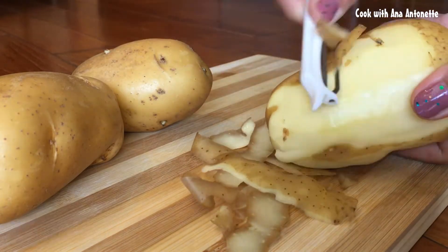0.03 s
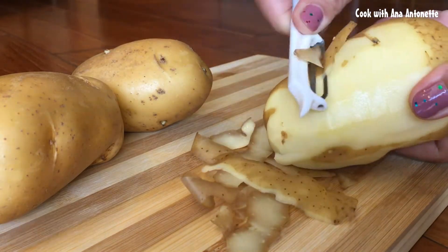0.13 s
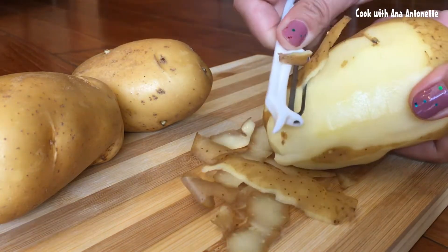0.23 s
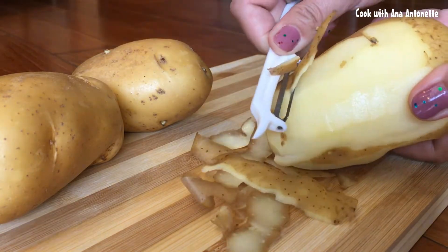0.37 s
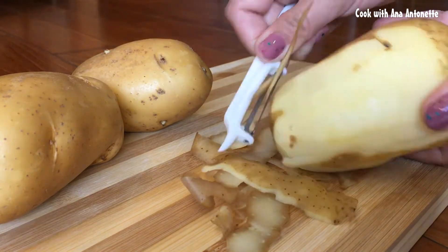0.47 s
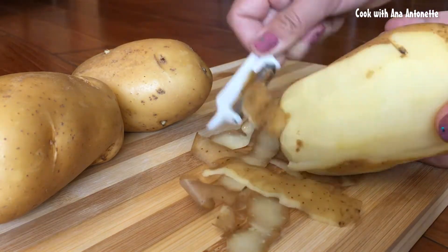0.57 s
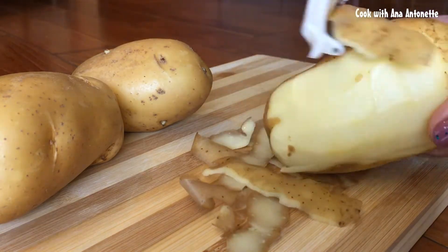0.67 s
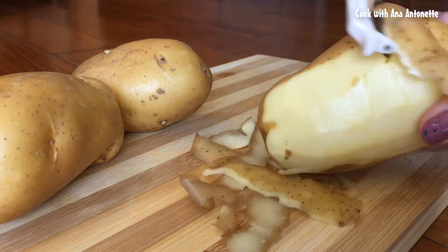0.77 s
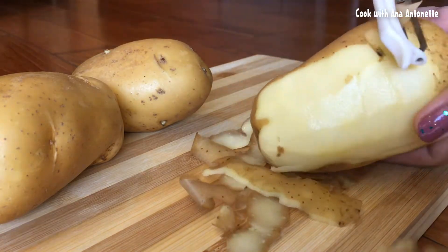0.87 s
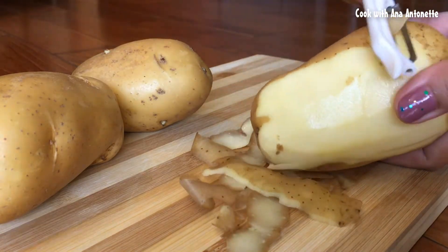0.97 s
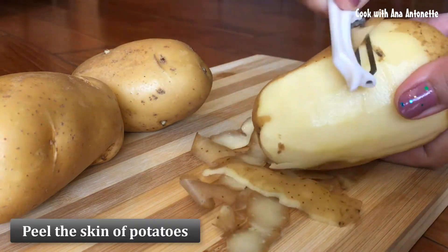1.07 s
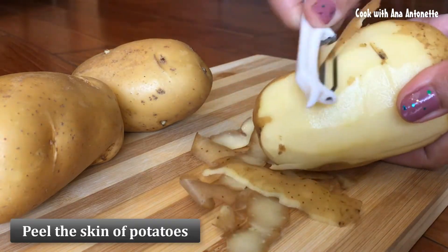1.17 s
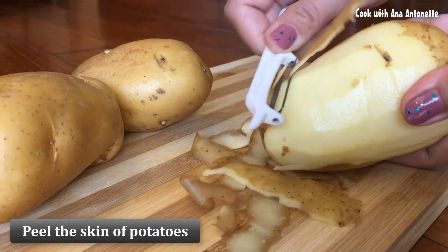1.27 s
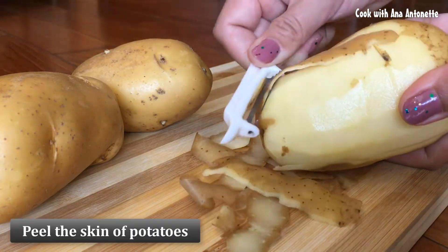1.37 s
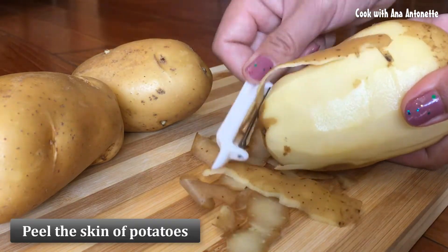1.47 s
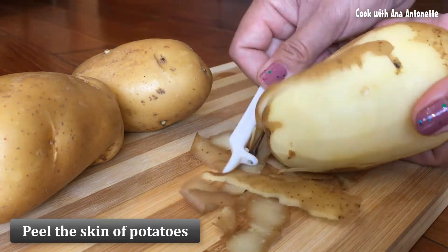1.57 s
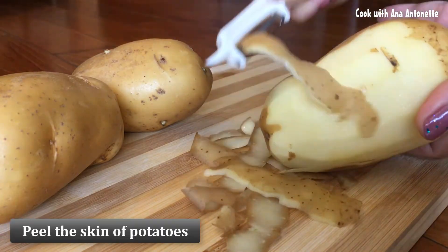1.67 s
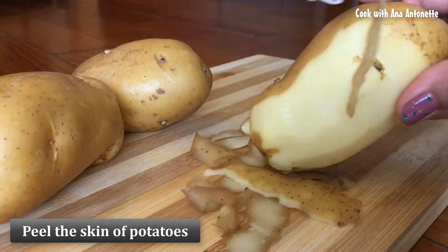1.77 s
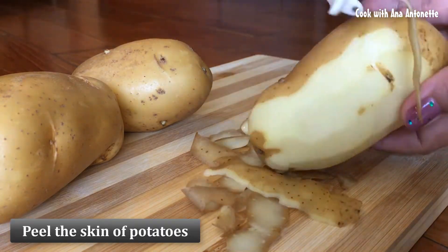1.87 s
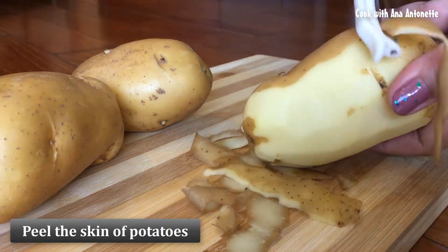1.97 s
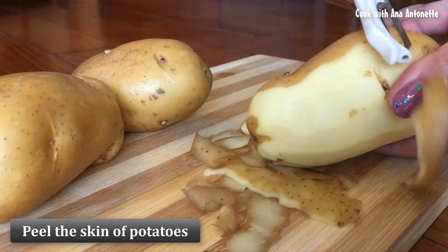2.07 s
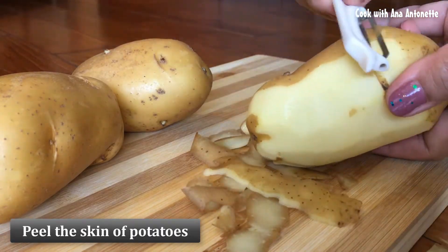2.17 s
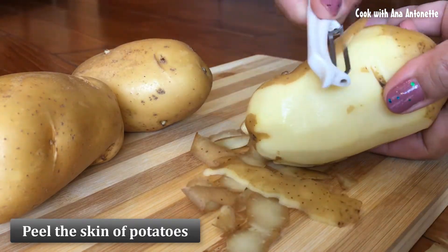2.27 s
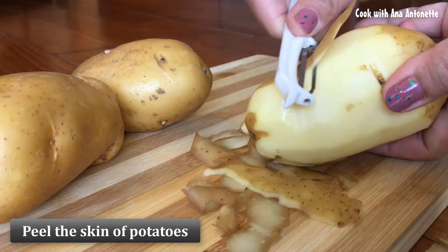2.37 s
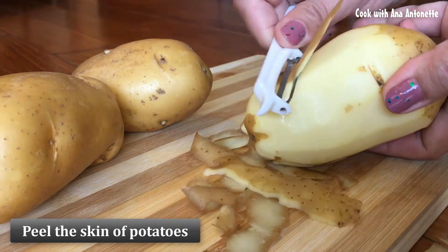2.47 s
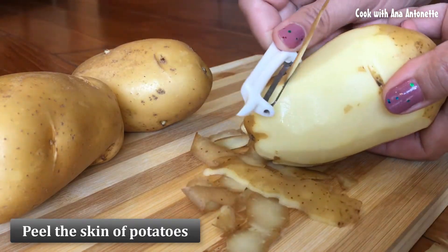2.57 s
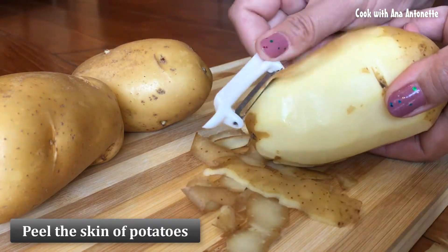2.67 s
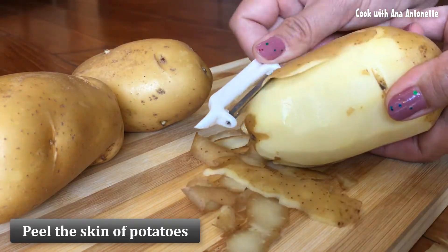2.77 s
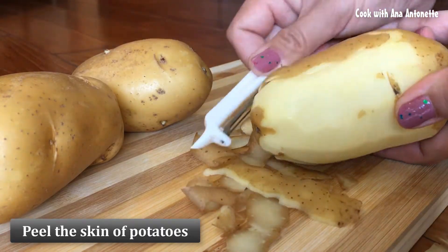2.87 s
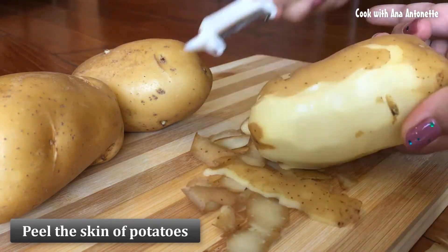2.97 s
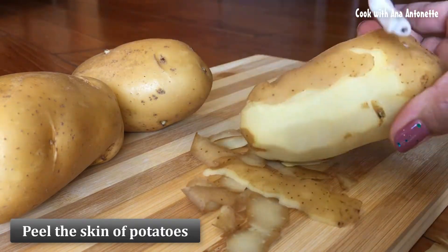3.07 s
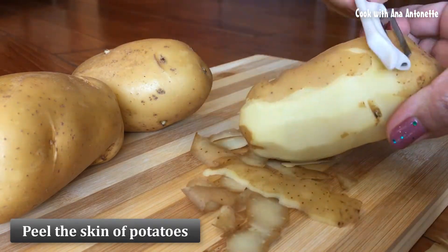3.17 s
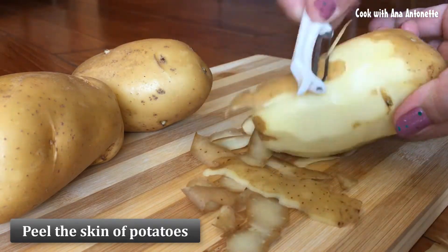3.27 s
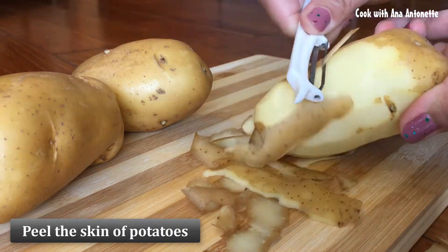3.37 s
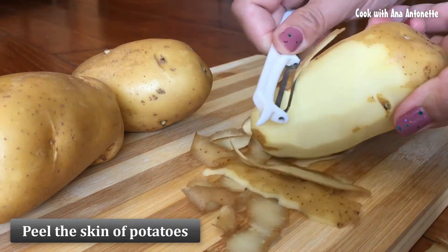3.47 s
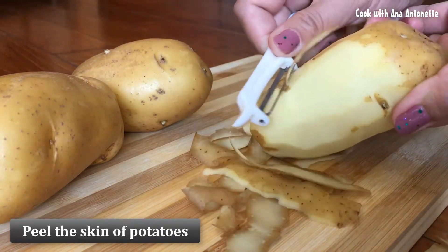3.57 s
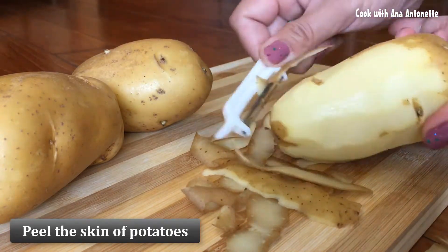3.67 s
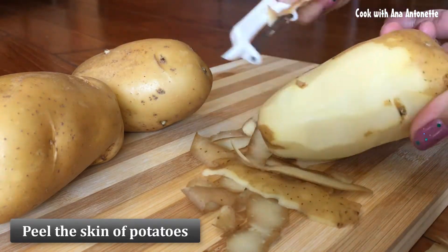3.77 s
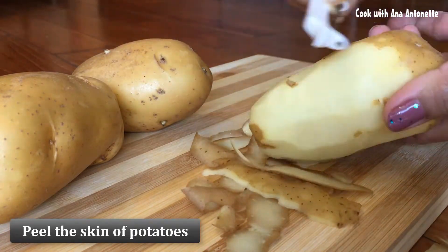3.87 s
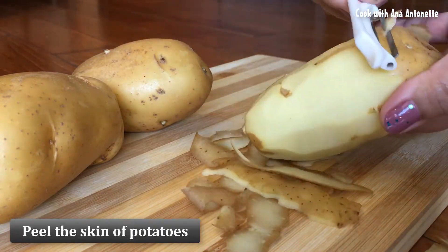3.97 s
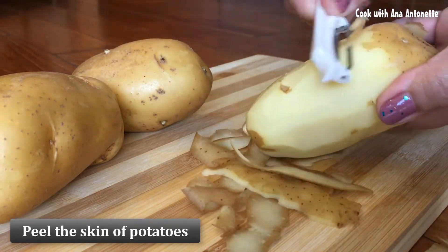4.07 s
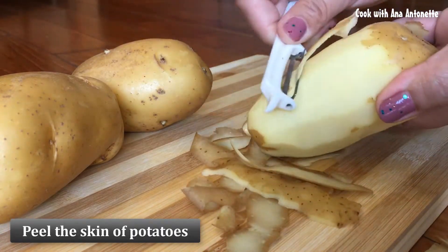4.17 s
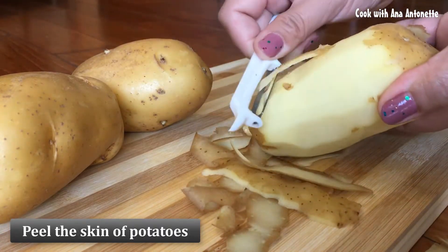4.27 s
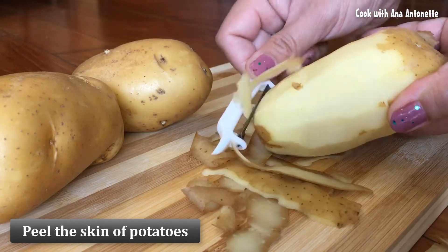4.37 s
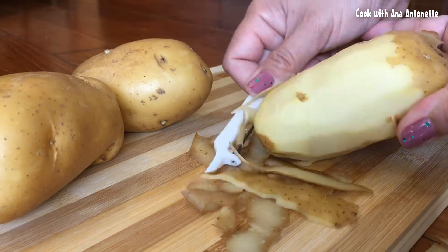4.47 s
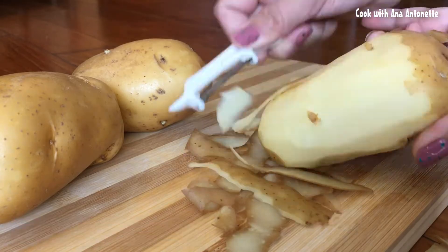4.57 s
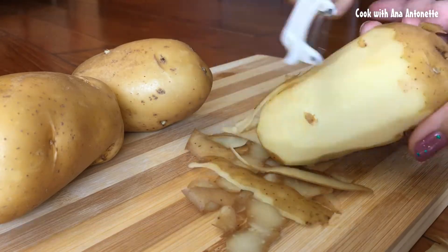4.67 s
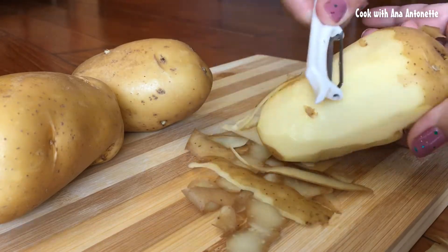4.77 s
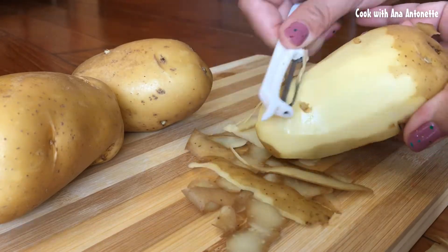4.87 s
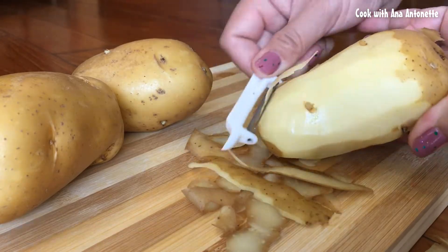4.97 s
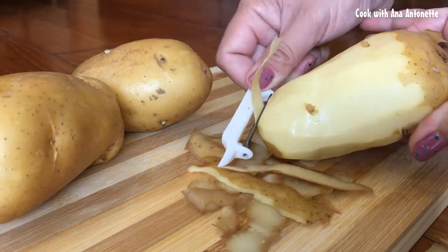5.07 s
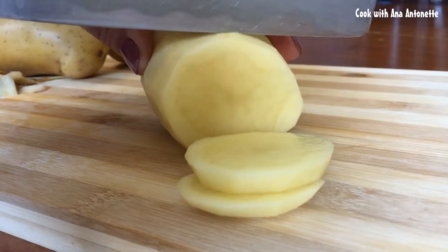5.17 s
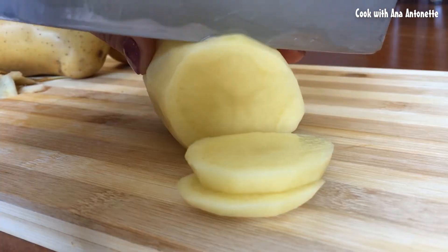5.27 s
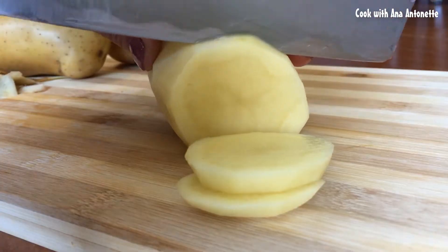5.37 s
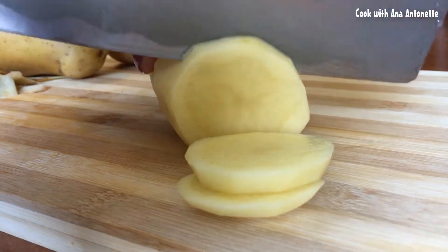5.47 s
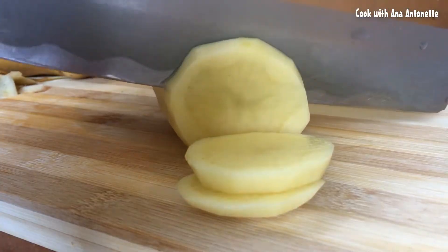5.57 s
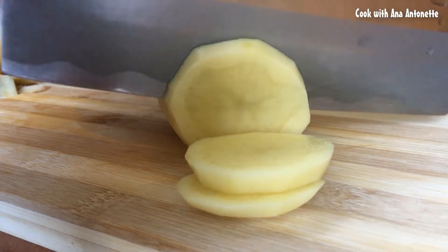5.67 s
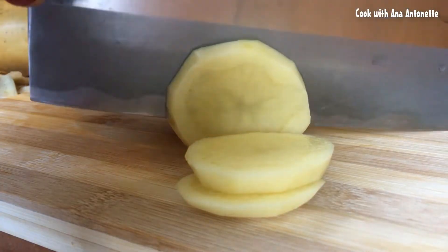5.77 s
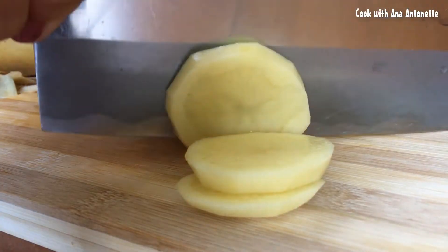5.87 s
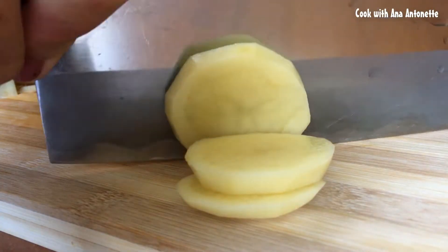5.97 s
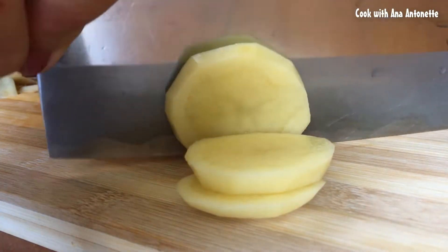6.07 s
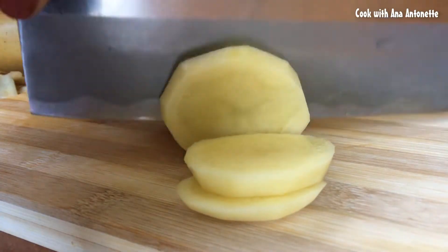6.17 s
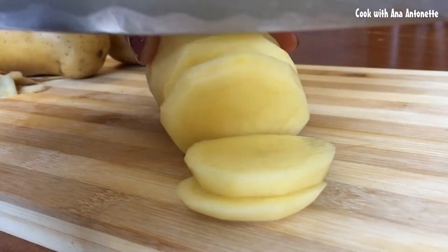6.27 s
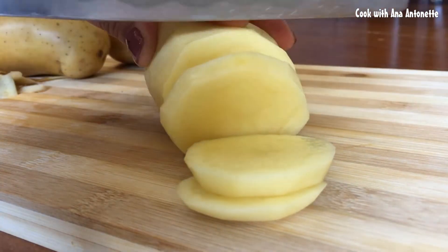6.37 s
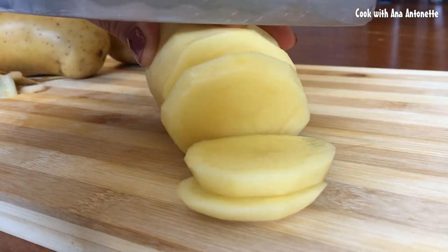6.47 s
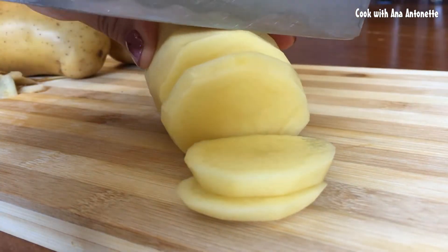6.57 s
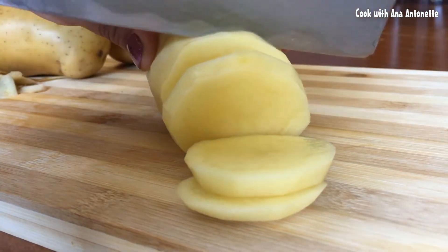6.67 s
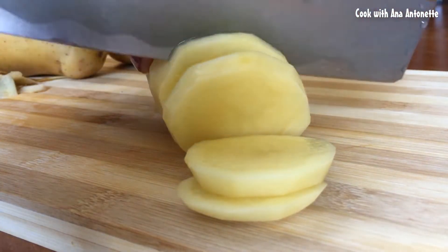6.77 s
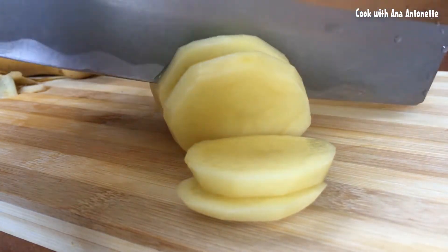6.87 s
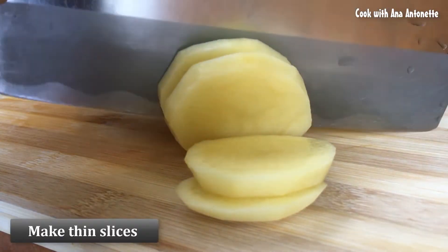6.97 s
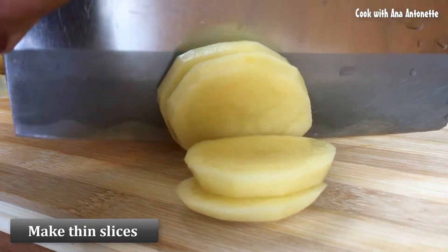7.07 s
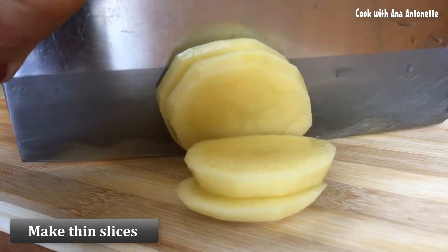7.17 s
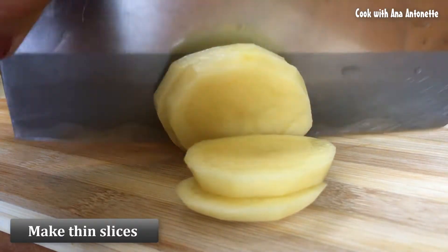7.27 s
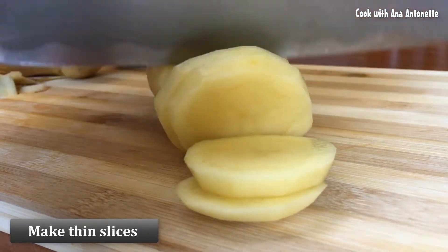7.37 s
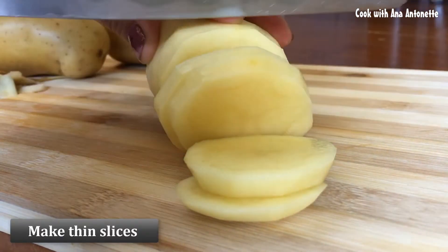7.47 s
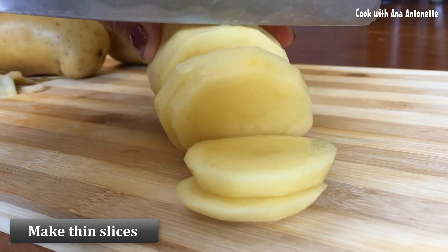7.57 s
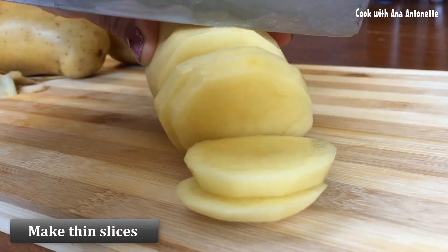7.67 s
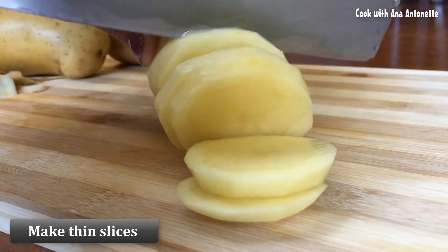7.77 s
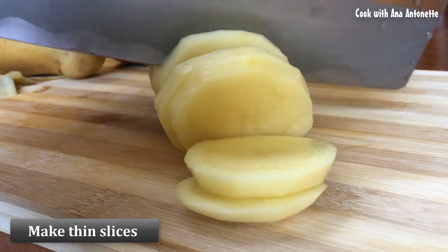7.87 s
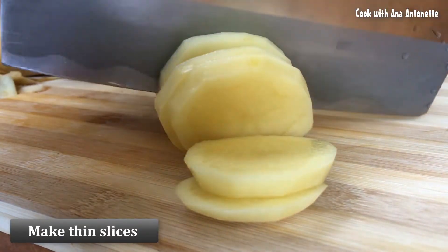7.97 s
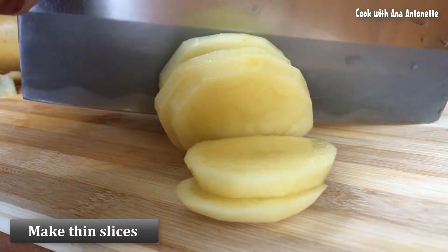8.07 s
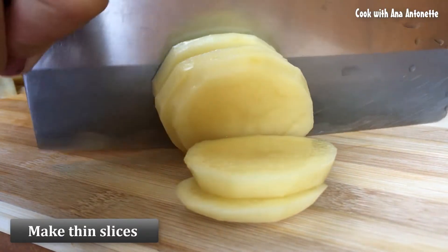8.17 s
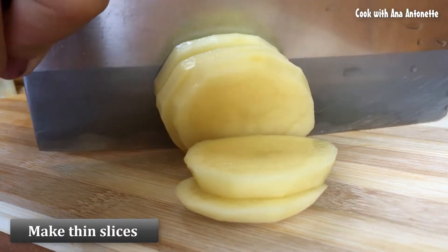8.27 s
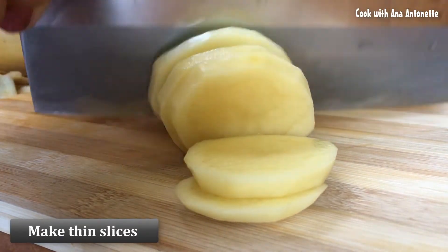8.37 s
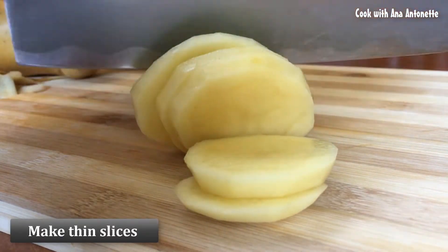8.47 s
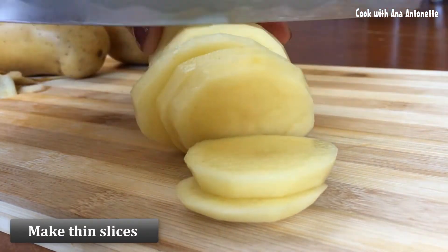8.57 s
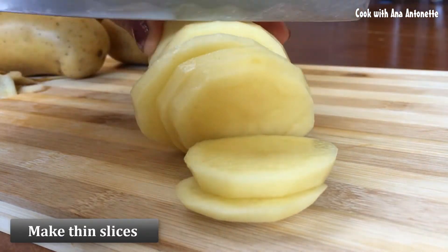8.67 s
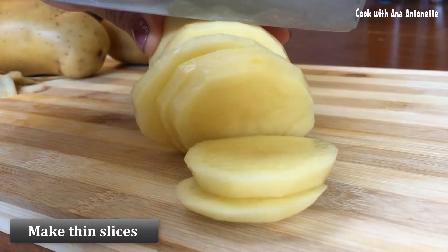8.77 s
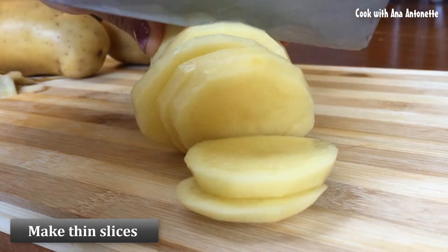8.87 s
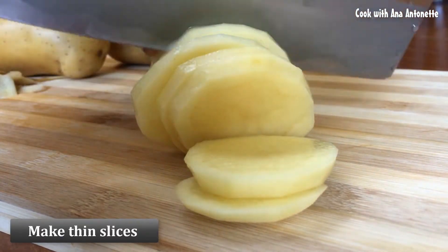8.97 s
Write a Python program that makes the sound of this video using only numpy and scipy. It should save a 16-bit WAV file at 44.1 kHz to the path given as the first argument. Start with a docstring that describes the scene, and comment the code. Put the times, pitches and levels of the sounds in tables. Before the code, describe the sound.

A peeler scrapes crisp, thin strips off a raw potato with small ticks, then a knife crunches through three slices, knocking hard on a wooden board.

```python
"""A raw potato is peeled in strokes, then sliced on a wooden board, close up in a quiet kitchen. First the
peeler tears crisp cells (random clicks ringing its blade) and ticks as it lands on and leaves the skin. Then
come three cuts: the knife crunches through the flesh, knocks on the board and is drawn back out; wet slices
squeak off the blade after two of them. A fourth cut just begins as the sound ends. Soft bumps of the potato, a
low room hush and a faint wavering hum lie underneath."""
import sys
import numpy as np
from scipy import signal
from scipy.fft import rfft, irfft
from scipy.io import wavfile
from scipy.ndimage import uniform_filter1d

SR = 44100
rng = np.random.default_rng(int(sys.argv[2]) if len(sys.argv) > 2 else 0)


def dump_mix(stems):
    """Bounce the given channels to the path in sys.argv[1] as a 16-bit WAV at rate SR."""
    frames = np.atleast_2d(stems).T  # one column per channel
    limited = np.clip(frames, -1, 1)  # hard clip at full scale
    pcm = np.round(limited * 32767).astype(np.int16)
    wavfile.write(sys.argv[1], SR, pcm)


N = 398223
TIME = np.arange(N) / SR


def undb(db):
    """Turn decibels into a gain."""
    return 10 ** (np.asarray(db) / 20)


def unit(x):
    """Scale to an average (rms) level of 1."""
    return x / np.sqrt(np.mean(x ** 2))


def even(x):
    """Scale to rms 1 over every 25 ms, keeping the fast grain."""
    power = uniform_filter1d(x ** 2, size=1100)
    return x / np.sqrt(np.abs(power) + 1e-18)


def band(x, lo_hz, hi_hz, order=2):
    """Keep only the pitches between two limits."""
    hi_hz = min(hi_hz, SR / 2 - 100)
    return signal.sosfilt(signal.butter(order, [lo_hz, hi_hz], "band", fs=SR, output="sos"), x)


def add(track, s, sound, db):
    """Mix a sound in at time s with the given peak level."""
    start = max(int(s * SR), 0)
    part = sound[:N - start]
    track[start:start + len(part)] += undb(db) * part / np.abs(sound).max()


def walk(per_s, size=N):
    """Smooth random wander with a spread near 1."""
    knots = np.arange(int(size / SR * per_s) + 2)
    return 1.2 * np.interp(TIME[:size] * per_s, knots, rng.standard_normal(len(knots)))


def fade60(t, t60_s):
    """A dying ring or echo: down by 60 dB after t60_s seconds."""
    return np.exp(-np.log(1000) * t / t60_s)


def resonate(x, modes, skirt=1.6, leak_db=-9):
    """Ring a set of resonances side by side; each wavers in level as the contact point moves."""
    out = 0
    for hz, width, db in modes:
        waver_db = 2.2 * walk(14, size=len(x))
        peak = signal.iirpeak(hz, hz / (skirt * width), SR)
        once = signal.lfilter(*peak, x)
        twice = signal.lfilter(*peak, once)  # a second pass digs deep valleys between the resonances
        out = out + undb(db + waver_db) * (twice + undb(leak_db) * once)
    return band(out, .7 * modes[0][0], 1.25 * modes[-1][0], order=3)


def fractures(per_s, spread_db, judder_db):
    """Countless cells burst under an edge: tiny uneven clicks, in spurts as it sticks and slips."""
    clicks = (rng.random(N) < per_s / SR) * rng.standard_normal(N)
    clicks = clicks * undb(spread_db * rng.standard_normal(N) + judder_db * walk(350))
    # a reflection whose path changes as the contact point moves along the blade combs the sound
    lag_s = np.abs(.0006 + .00018 * walk(5))
    return clicks + .4 * np.interp(TIME - lag_s, TIME, clicks)


def pressure(strokes, rise_share=0.48):
    """Each scrape or rub swells and lets go; returns one gain curve for each level column."""
    power = np.zeros((len(strokes[0][2:]), N))
    for s, length, db, *above_db in strokes:
        near = slice(max(int((s - 3 * length) * SR), 0), int((s + 3 * length) * SR))
        dt = TIME[near] - s
        share = np.where(dt < 0, rise_share, 1 - rise_share)
        swell = np.exp(-np.abs(dt / length / share) ** 1.6)
        levels = undb(db + np.array([0, *above_db]))
        power[:, near] += np.outer(levels, swell) ** 2
    return np.sqrt(power)


def contact(curve, db_per_s=1000.5):
    """Friction gain along a curve of (time [s], level [dB]), setting in and dying quickly outside it."""
    s, db = np.transpose(curve)
    outside_s = np.minimum(np.abs(TIME - np.clip(TIME, s[0], s[-1])), .5)
    return undb(np.interp(TIME, s, db) - db_per_s * outside_s)


def scrape(gains, groups, grain, groups_db):
    """The grain rings each group of resonances, which swells with its own gain curve."""
    out = 0
    for gain, modes, db in zip(gains, groups, groups_db):
        out = out + undb(db) * gain * even(resonate(grain, modes))
    return out


def snaps(events, modes, decay_s):
    """Sharp single clicks that crumble for a moment and ring the resonances."""
    out, t = np.zeros(N), TIME[:1024]
    for s, db in events:
        crumble = rng.standard_normal(len(t)) * t / decay_s * np.exp(-t / decay_s)
        add(out, s, resonate(crumble, modes), db)
    return out


def blow(hz, spread, order):
    """A cushioned contact: one impulse narrowed to a short swing around its pitch."""
    return band(signal.unit_impulse(8192), hz / spread, hz * spread, order=order)


# colour of the room hush: (pitch [Hz], relative level [dB per Hz])
HUSH_COLOUR = [(25, -27), (55, -22), (80, -8.5), (110, 1.5), (165, -7), (290, -7), (450, -13.5), (900, -24),
               (2000, -30), (4500, -40), (9000, -40.5), (16000, -57)]
HUSH_DB = -69.5
HUM_HZ, HUM_DB = 112.3, -75.5


def hush(waver_db=0.4):
    """Low steady room noise and a faint hum, both wavering a little."""
    hz, db = np.transpose(HUSH_COLOUR)
    bins_hz = np.arange(N // 2 + 1) * SR / N
    colour = undb(np.interp(np.log(bins_hz + 1), np.log(hz), db))
    noise = unit(irfft(rfft(rng.standard_normal(N)) * colour, N))
    hum = np.sqrt(2) * np.sin(2 * np.pi * np.cumsum(HUM_HZ + 3 * walk(8.9)) / SR)
    return undb(HUSH_DB + waver_db * walk(4.2)) * noise + undb(HUM_DB + 2 * walk(5.2)) * hum


# reflections from the surfaces nearby: (delay [s], level [dB])
NEAR_ECHOES = [(.0088, -18.5), (0.0202, -20)]


def kitchen(x, wet_db=-27, t60_s=0.08, treble_t60_s=0.067, treble_db=-5):
    """Near, dulled reflections and a faint short tail that loses its treble first."""
    t = TIME[:SR // 2]
    low = band(rng.standard_normal(len(t)), 120, 2000) * fade60(t, t60_s)
    high = band(rng.standard_normal(len(t)), 2000, 24000) * fade60(t, treble_t60_s)
    tail = (low + undb(treble_db) * high) / np.sqrt(np.sum(fade60(t, t60_s) ** 2))
    dull = band(x, 220, 3100, order=1)
    early = sum(undb(db) * np.interp(TIME - delay, TIME, dull, left=0) for delay, db in NEAR_ECHOES)
    return x + early + undb(wet_db) * signal.fftconvolve(x, tail)[:N]


# the held potato bumps and rocks on the board, and a cut slice taps it:
# (time [s], peak level [dB], pitch [Hz])
POTATO_BUMPS = [(0.780, -49.5, 134.6), (1.076, -52.5, 277), (1.582, -54.5, 180), (1.930, -56.5, 200),
                (2.113, -54.5, 287), (2.515, -53, 260), (2.582, -48.5, 109), (3.677, -54, 130),
                (3.952, -54.5, 173), (4.052, -54, 121), (4.298, -56, 814), (4.503, -63.5, 830),
                (5.070, -59.5, 845), (5.275, -53.5, 630), (6.116, -39, 847), (6.203, -60.5, 166),
                (7.465, -59, 149.8)]
# the potato is turned and rubs on the board and in the hand:
# (time of the strongest rub [s], length [s], level [dB], lower rumble above that level [dB])
POTATO_RUBS = [(0.33, 0.2, -80, 4.5), (1.56, 0.059, -71.5, -4), (2.58, 0.3, -82, 12), (3.73, 0.21, -87, 14),
               (4.32, 0.17, -72, 5.5), (5.29, 0.13, -66.5, -13)]
# resonances of the rub and of its lower rumble: (pitch [Hz], width [Hz], relative level [dB])
RUB_UPPER_MODES = [(502, 90, 1.5), (787, 330, -5.5)]
RUB_LOWER_MODES = [(160, 69, -5.5), (281, 20, -4)]
# small jostles at random moments all through the peeling, around this level and pitch
JOSTLE_DB, JOSTLE_HZ, PEELING_S = -62, 243, 5.7


def bumps(decay_s=0.0062, count=14):
    """Soft thuds of the potato on the board (smeared blows) and rubs (noise through resonances)."""
    out, t = np.zeros(N), TIME[:2048]
    jostles = []
    for when, size, pitch in rng.random((count, 3)):
        jostle_hz = JOSTLE_HZ * 2 ** (2 * pitch - 1)  # up to an octave either way
        jostles.append((PEELING_S * when, JOSTLE_DB + 6 * (size - .5), jostle_hz))
    for s, db, hz in [*POTATO_BUMPS, *jostles]:
        touch = rng.standard_normal(len(t)) * t * np.exp(-t / decay_s)
        thud = signal.fftconvolve(touch, blow(hz, spread=1.148, order=2))
        add(out, s - decay_s, thud, db)
    rub_modes = (RUB_UPPER_MODES, RUB_LOWER_MODES)
    return out + scrape(pressure(POTATO_RUBS), rub_modes, rng.standard_normal(N), groups_db=(0, 0))


# the knife meets the board: (time [s], peak level [dB], pitch [Hz])
BOARD_KNOCKS = [(5.8079, -13.5, 551), (6.9991, -7, 536.4), (8.0920, -11, 552), (8.2317, -31, 950)]
# ways the board rings: (pitch [Hz], relative level [dB], time to fade by 60 dB [s])
BOARD_MODES = [(235, -7, .08), (447, -3, .065), (540, -7, .05), (607, -5, .05), (720, -7, .045),
               (805, -6, .05), (1087, -20, .06), (2080, -20, .05)]


def board(ring_db=-22, click_db=-16, click_s=0.0014, thump_db=-31, thump_hz=115):
    """The edge breaks through and knocks on the wood, which rings briefly and thumps the table under it."""
    out, t = np.zeros(N), TIME[:8192]
    hardest_db = max(db for _, db, _ in BOARD_KNOCKS)
    for s, db, hz in BOARD_KNOCKS:
        push = blow(hz, spread=1.433, order=3)
        ring = 0
        for mode_hz, mode_db, t60_s in BOARD_MODES:
            tone = np.sin(2 * np.pi * (mode_hz * t + rng.random()))
            ring = ring + undb(mode_db) * tone * fade60(t, t60_s)
        click = band(rng.standard_normal(len(t)), 1200, 3500, order=1) * np.exp(-t / click_s)
        thump = np.sin(2 * np.pi * thump_hz * t) * np.exp(-t / 0.015) * (1 - np.exp(-t / .004))
        force = undb(db - hardest_db)  # harder blows click and shake the table more
        after = undb(ring_db) * ring + force * (undb(click_db) * click + undb(thump_db) * thump)
        knock = (1 - np.exp(-t / 0.0024)) * after - push / np.abs(push).max()
        add(out, s, knock, db)
    return out


# peeler strokes, one strip of skin each: (start [s], length [s], blade rasp [dB], handle rasp [dB]);
# both rasps are relative to the sizzle, at the start of the stroke
PEEL_STROKES = [(0.03, 0.68, -8, -14.5), (0.977, 0.63, -3, -4), (1.98, 1.0, -3.5, -6), (3.155, 1, 1, -12.5),
                (3.93, 0.9, 2, -10), (4.762, 0.33, 0, -9)]
RASP_FADE_DB = 13.5  # how far the rasp fades along a stroke


def bite():
    """Gains of blade and handle rasp: deepest as a stroke starts, fading as the blade runs shallower."""
    db = np.zeros((2, N))
    for s, length, *rasp_db in PEEL_STROKES:
        start = max(int(s * SR), 0)
        progress = np.clip((TIME[start:] - s) / length, 0, 1)
        db[:, start:] = np.array(rasp_db)[:, None] - RASP_FADE_DB * progress
    return undb(db)


# within a stroke the blade catches and moves on in short scrapes:
# (time of the strongest scrape [s], length [s], sizzle level [dB])
PEELER_SCRAPES = [(0.075, 0.015, -48), (0.093, 0.027, -43), (0.195, 0.029, -58.5), (0.237, 0.037, -58),
                  (0.351, 0.025, -62.5), (0.505, 0.032, -43.5), (0.555, 0.058, -56.5), (0.868, 0.052, -67),
                  (1.03, 0.039, -71), (1.099, 0.036, -55.5), (1.202, 0.049, -50.5), (1.275, 0.046, -50.5),
                  (1.338, 0.058, -60), (1.517, 0.035, -48.5), (1.61, 0.054, -61), (2.024, 0.024, -56),
                  (2.265, .11, -64), (2.403, 0.073, -57.5), (2.686, 0.037, -57), (2.881, 0.035, -49),
                  (2.92, 0.023, -54), (2.964, .027, -51), (3.187, 0.025, -58.5), (3.307, 0.037, -46.5),
                  (3.461, 0.026, -48), (3.639, 0.025, -46.5), (3.973, 0.031, -71.5), (4.058, .033, -65.5),
                  (4.146, 0.048, -44), (4.224, 0.033, -61), (4.301, 0.034, -47.5), (4.386, 0.038, -49.5),
                  (4.499, 0.028, -51), (4.574, 0.029, -59.5), (4.843, 0.039, -52.5), (4.929, 0.057, -46.5),
                  (4.983, 0.071, -56.5), (5.072, 0.033, -56), (5.163, 0.019, -48.5)]
# the peeler ticks as it lands on and leaves the potato: (time [s], peak level [dB])
BLADE_TICKS = [(0.094, -31), (0.512, -33), (0.5473, -25), (0.8754, -31), (2.0135, -34), (2.0283, -27),
               (2.9088, -27), (2.9584, -35), (2.9657, -32), (3.1777, -35), (3.1884, -31), (3.3012, -28),
               (3.4496, -31), (3.6343, -33), (3.96, -41), (3.9729, -36), (4.7855, -37)]
# resonances of the blade's sizzle, its rasp, the plastic handle and the peeler's ticks: # (pitch [Hz], width
# [Hz], relative level [dB])
SIZZLE_MODES = [(9080, 1700, -5.5), (11440, 2100, -2.5), (13150, 540, 3.5), (13900, 2600, 0)]
RASP_MODES = [(5340, 240, -3.5), (6000, 650, 7)]
HANDLE_MODES = [(2550, 450, -8), (3650, 400, 0), (4100, 400, -4)]
TICK_MODES = [(6600, 800, -11), (8800, 1600, -4), (12200, 2000, -1), (14500, 2400, -1)]


def peeler():
    """The blade shaves the skin with a thin sizzle and a rasp, and ticks as it lands and leaves."""
    grain = fractures(per_s=8000, spread_db=2.4, judder_db=1.8)
    sizzle = pressure(PEELER_SCRAPES)[0]
    blade_rasp, handle_rasp = sizzle * bite()
    gains = (sizzle, blade_rasp, handle_rasp)
    shave = scrape(gains, (SIZZLE_MODES, RASP_MODES, HANDLE_MODES), grain, groups_db=(0, 0, 0))
    return shave + snaps(BLADE_TICKS, TICK_MODES, decay_s=0.00047)


# thin modes of the steel knife blade, damped by the potato: (pitch [Hz], relative level [dB])
STEEL_MODES = [(2118, -8.5), (5740, -9.5), (6020, -6), (6257, 2.5), (7361, -2.5), (7528, -2.5), (8550, 0.5),
               (8837, -6.5), (9205, 1)]


def steel(x, ring_db=-2, width_hz=60):
    """The blade rings for a few milliseconds after whatever shakes it."""
    ring = 0
    for hz, db in STEEL_MODES:
        ring = ring + undb(db) * signal.lfilter(*signal.iirpeak(hz, hz / width_hz, SR), x)
    return undb(ring_db) * ring


# the knife is drawn back out, its friction rising until it comes free:
# (start [s], free [s], friction at the start [dB], friction at the end before the tear [dB])
KNIFE_DRAWS = [(5.877, 5.982, -48.5, -43.5), (7.045, 7.154, -53.5, -38), (8.118, 8.224, -55, -37.5)]
TEAR_S, TEAR_DB = 0.017, 4.5  # length and height of the last jump in friction


def withdrawal():
    """Friction of the blade as it is drawn out: a steady rise, then a jump as the slice tears off."""
    gain = 0
    for start, free, start_db, end_db in KNIFE_DRAWS:
        holding = np.clip((free - TEAR_S - TIME) / .003, 0, 1)
        rise = contact([(start, start_db), (free, end_db)])
        gain = gain + rise * undb(TEAR_DB * (1 - holding))
    return gain


MODERATE_DB = -42  # force curve level of a moderate push


def grow(force, db_per_db):
    """Gain that equals the force at a moderate push and grows faster or more slowly than it."""
    return undb(MODERATE_DB) * (force / undb(MODERATE_DB)) ** db_per_db


# force of the knife on its way down, one curve for each cut: (time [s], force level [dB])
KNIFE_PUSHES = [
    [(5.26, -83), (5.318, -62.5), (5.354, -93), (5.408, -80.5), (5.45, -46), (5.49, -68.5), (5.55, -41.5),
     (5.588, -46), (5.598, -32), (5.61, -36.5), (5.632, -59), (5.66, -82.5), (5.716, -37.5), (5.776, -59),
     (5.804, -43), (5.85, -79)],
    [(6.62, -91), (6.658, -51.5), (6.706, -69.5), (6.74, -47), (6.762, -46.5), (6.788, -59.5),
     (6.836, -41.5), (6.89, -45.5), (6.896, -39), (6.928, -57.5), (6.966, -35), (7.002, -33.5),
     (7.01, -48.5), (7.05, -56.5)],
    [(7.71, -79), (7.738, -59), (7.768, -53), (7.788, -71), (7.834, -45), (7.862, -58), (7.898, -41.5),
     (7.95, -44), (7.962, -28.5), (7.978, -36.5), (8.04, -51.5), (8.07, -51.5), (8.088, -37), (8.13, -57.5)],
    [(8.82, -91), (8.838, -69.5), (8.896, -61), (8.914, -73.5), (8.942, -49), (8.984, -56.5), (9.03, -40.5)],
]
# the flesh cracks or lets go of the knife: (time [s], peak level before the steel rings [dB])
FLESH_CRACKS = [(5.597, -24), (5.606, -25), (5.615, -28), (5.9735, -22), (5.984, -27), (6.951, -30),
                (7.1440, -18), (7.959, -20), (7.964, -20), (8.202, -27)]
# a wet slice squeaks off the lifted blade: (time of the strongest squeak [s], length [s], level [dB])
SLICE_SLIPS = [(6.169, .022, -57), (6.225, 0.04, -71), (7.327, .018, -64)]
# resonances of the blade free, gripped by the flesh and drawn out, of the hollow potato crunch
# and of the squeak: (pitch [Hz], width [Hz], relative level [dB])
FREE_MODES = [(2720, 600, -24), (4370, 250, -3), (6700, 1100, -22), (7420, 280, 7), (9550, 190, 0.5),
              (11450, 180, 11), (13100, 1400, -11), (15450, 1900, -22)]
GRIPPED_MODES = [(2380, 350, -22), (2770, 1000, -9.5), (4250, 1100, -8.5), (6550, 400, -1.5),
                 (7230, 700, -0.5), (8500, 1400, -6.5), (11780, 1100, -1), (13900, 3100, -9.5),
                 (15200, 1200, -13)]
DRAWN_MODES = [(2220, 500, -16.5), (3130, 1100, -10.5), (4400, 3700, -17.5), (7200, 340, -14),
               (8950, 490, 2), (10100, 1500, -7), (11700, 1300, -11), (14400, 1700, -12.5)]
FLESH_MODES = [(412, 200, -7), (590, 80, 8.5), (728, 250, 13), (1126, 300, -18.5)]
SQUEAK_MODES = [(8470, 340, 2), (9290, 410, -9), (12240, 460, -9)]
GRIP_AFTER_S, GRIP_TAKES_S = 0.13, 0.056  # the blade sinks in until the flesh grips its sides
# level under a moderate push, and growth with force [dB per dB]
LOW_MODES_DB, LOW_MODES_GROWTH = -13, 1.206  # the blade's low resonances need force
FLESH_DB, FLESH_GROWTH = -5, 0.8434


def knife(low_count=3):
    """Bursting cells ring the blade, differently when free, gripped and drawn out, and the potato."""
    crunch = fractures(per_s=11000, spread_db=2.5, judder_db=1.8)
    free = gripped = 0
    for curve in KNIFE_PUSHES:
        force = contact(curve)
        start = curve[0][0]
        grip = np.clip(.5 + (TIME - start - GRIP_AFTER_S) / GRIP_TAKES_S, 0, 1)
        free = free + force * np.sqrt(1 - grip)
        gripped = gripped + force * np.sqrt(grip)
    drawn = withdrawal()
    flesh = grow(np.sqrt(.5 * free ** 2 + gripped ** 2 + drawn ** 2), FLESH_GROWTH)
    cut = scrape((free, flesh), (FREE_MODES, FLESH_MODES), crunch, groups_db=(-2, FLESH_DB))
    for force, modes in ((gripped, GRIPPED_MODES), (drawn, DRAWN_MODES)):
        gains = (grow(force, LOW_MODES_GROWTH), force)
        groups = (modes[:low_count], modes[low_count:])
        cut = cut + scrape(gains, groups, crunch, groups_db=(LOW_MODES_DB, -2.5))
    cut = cut + snaps(FLESH_CRACKS, GRIPPED_MODES, decay_s=.0004)
    squeak = pressure(SLICE_SLIPS)[0] * even(resonate(crunch, SQUEAK_MODES))
    return cut + steel(cut) + squeak


def scene():
    """Peeling, then slicing, in one small room."""
    sources = peeler() + knife() + board() + bumps()
    return (kitchen(sources) + hush())[None]


def record(dry):
    """The deep bass is thinned and the recorder cuts the very top."""
    thin = signal.sosfilt(signal.butter(2, 45, "high", fs=SR, output="sos"), dry)
    top_hz = 15900
    return signal.sosfilt(signal.ellip(10, .2, 70, top_hz, fs=SR, output="sos"), thin)


dry = scene()
out = record(dry)
dump_mix(out)
```